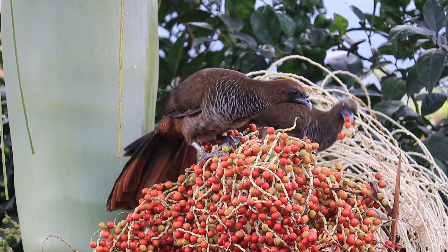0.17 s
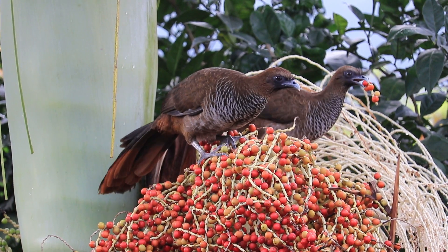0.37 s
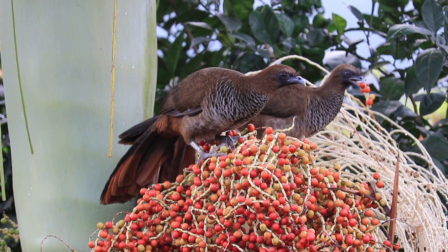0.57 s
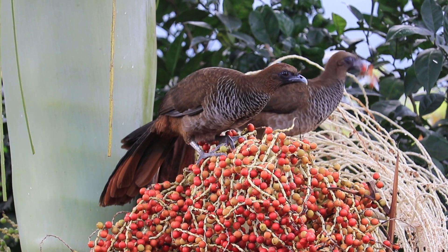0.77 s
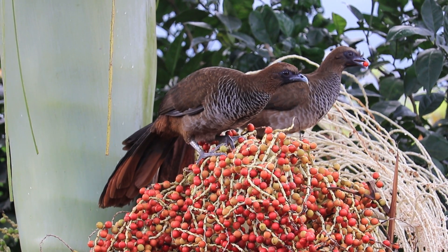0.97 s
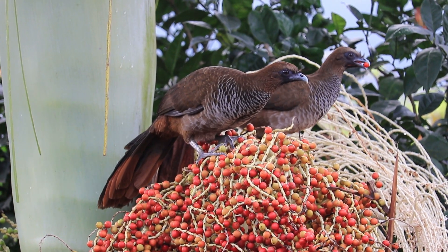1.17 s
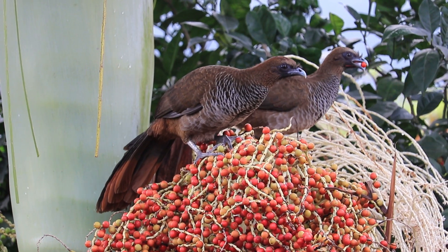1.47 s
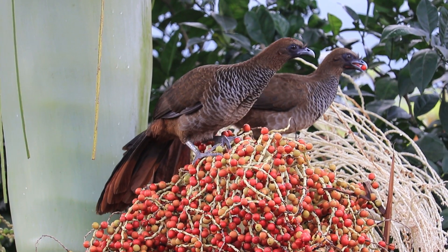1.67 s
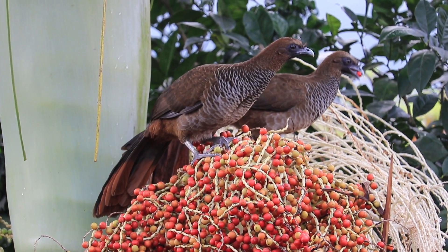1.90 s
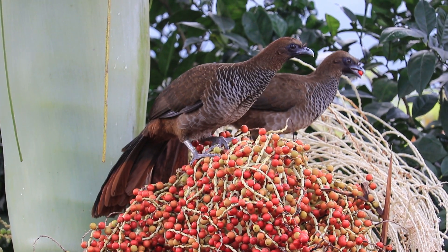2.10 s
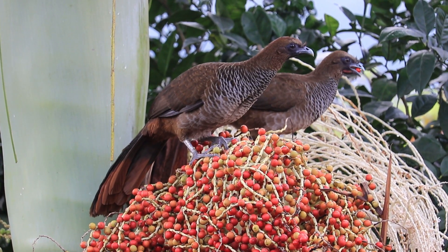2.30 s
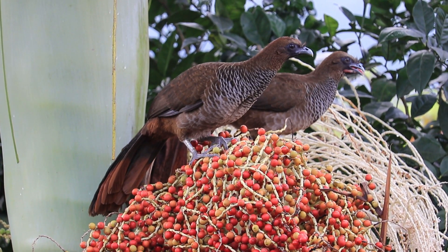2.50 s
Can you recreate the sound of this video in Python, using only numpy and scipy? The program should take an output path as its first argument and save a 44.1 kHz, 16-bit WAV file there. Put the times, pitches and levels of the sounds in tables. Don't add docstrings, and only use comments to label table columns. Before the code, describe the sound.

Outdoor stereo pickup, birds near centre: piercing whistled whines and hoarse falling squawks overlap, with a small bird's quick scolding and twittering midway, light twig knocks, leaf hiss, hard short echoes and low distant traffic.

```python
import sys
import numpy as np
from scipy import signal
from scipy.fft import rfft, irfft, next_fast_len
from scipy.io import wavfile
from scipy.ndimage import uniform_filter1d, map_coordinates

SR = 44100
rng = np.random.default_rng(int(sys.argv[2]) if len(sys.argv) > 2 else 0)


def attenuation_scalar(level_db):
    decades = np.asarray(level_db, float) / 20
    return 10 ** decades


def bounce(signal):
    frames = np.transpose(np.atleast_2d(signal))
    limited = np.clip(frames, -1, 1)
    pcm = np.round(limited * 32767).astype(np.int16)
    wavfile.write(sys.argv[1], SR, pcm)


N = 116865

# time_s, pitch_hz, level_db, overtone_level_db
WHINE_NOTES = [
    [(.243, 1558, -35, -60), (.27, 1775, -22.5, -63), (.31, 1843, -12, -64), (.36, 1760, -23.5, -46),
     (.44, 1770, -21.5, -44), (.55, 1841, -19.5, -45.5), (.65, 1877, -25, -35), (.78, 1875, -23, -36),
     (.803, 1504, -49, -47)],
    [(1.645, 1530, -26, -62), (1.656, 1627, -27.5, -56), (1.668, 1767, -28, -50),
     (1.697, 1796, -15.5, -44.5), (1.737, 1746, -23.5, -46), (1.753, 1695, -42, -39),
     (1.761, 1740, -21, -38), (1.782, 1654, -33, -43)],
    [(1.782, 1703, -45, -35), (1.795, 1697, -31, -38.5), (1.829, 1679, -26.5, -43),
     (1.863, 1690, -29.5, -39), (1.901, 1718, -35.5, -43), (1.931, 1716, -34, -34)],
    [(1.931, 1714, -37, -42), (1.949, 1710, -28.5, -38), (2.003, 1737, -23.5, -42.5),
     (2.021, 1725, -44, -40), (2.043, 1772, -23, -37.5), (2.12, 1806, -21, -35.5),
     (2.2, 1837, -23.5, -35.5), (2.226, 1348, -51, -37)],
]
# frequency_hz, gain_db
WINDPIPE = [(3300, -5), (3800, 5), (5250, -20), (5680, -1), (7150, 1), (7560, -10), (9000, -7), (9450, -20)]
# time_s, pitch_hz, level_db, overtone_level_db
SQUAWK_NOTES = [
    [(.16, 1653, -38, -82), (.175, 2140, -33, -40.5), (.19, 2310, -22.5, -30.5), (.203, 2280, -36, -27),
     (.218, 2280, -23, -30), (.262, 2188, -22, -29.5), (.35, 2062, -23, -23.5), (.42, 1963, -17.5, -30.5),
     (.485, 2004, -41, -46)],
    [(.46, 2062, -53, -48), (.5, 2103, -38, -41.5), (.58, 2027, -52, -43)],
    [(.92, 1600, -31.5, -75), (.933, 2085, -31.5, -40), (.947, 2252, -28, -33), (.975, 2285, -44, -33),
     (1.0, 2218, -15.5, -28.5), (1.06, 2094, -25.5, -26), (1.105, 2025, -18.5, -25.5),
     (1.135, 1963, -31, -34), (1.2, 1944, -48, -59)],
    [(2.16, 1600, -30, -86), (2.18, 2171, -27.5, -40), (2.21, 2237, -42, -31), (2.25, 2232, -23.5, -27.5),
     (2.29, 2107, -27, -28), (2.32, 2038, -29.5, -32), (2.35, 2030, -52, -40)],
]
# multiple_of_pitch, level_db, tilt_db_per_100_hz
SQUAWK_PARTIALS = [(2, -15, 5.5), (3, 3, -1), (3.5, -14.5, -0.5), (4, 2.5, 0), (5, -20, 0.5)]
# frequency_hz, density_db_per_hz
BREATH_SPECTRUM = [(4500, -30), (6200, -3), (7300, -9), (8400, 0), (9600, -26)]
# time_s, pitch_hz, level_db, pulse_level_db
RASP_NOTES = [
    [(.4, 1846, -33, -38), (.435, 1690, -23.5, -37), (.5, 1621, -26.5, -42), (.56, 1493, -41, -42)],
    [(1.095, 1600, -34, -12), (1.12, 1552, -32.5, -26), (1.2, 1540, -36.5, -29), (1.3, 1495, -40.5, -34.5),
     (1.37, 1488, -37.5, -32), (1.5, 1510, -39, -40.5), (1.62, 1480, -44, -43), (1.7, 1605, -30, -35)],
    [(2.28, 1668, -27, -25), (2.305, 1651, -25.5, -20.5), (2.335, 1555, -37, -28.5), (2.42, 1537, -34, -31),
     (2.5, 1520, -36, -33), (2.58, 1527, -33, -34.5), (2.66, 1505, -38, -33)],
]
# centre_hz, width_hz, level_db
THROAT_RESONANCES = [(1600, 220, -1.5), (1781, 317, 8), (2120, 120, -5), (3830, 1800, -79),
                     (6550, 920, -9.5), (8100, 870, -15.5)]
# start_s, length_s, start_hz, end_hz,
# level_db
CHIRP_GLIDES = [(0.11, 0.075, 2470, 2420, -34), (0.383, 0.18, 930, 827, -45),
                (0.654, 0.11, 9300, 9950, -52), (0.747, 0.023, 1200, 1100, -41.5),
                (1.25, .09, 4250, 3950, -52), (1.31, .07, 9300, 10100, -50),
                (1.375, .04, 10200, 10500, -45), (1.56, .035, 1180, 1170, -45),
                (1.65, .035, 6450, 7200, -41), (1.695, .04, 6450, 8200, -41),
                (1.755, .045, 9200, 10100, -53), (1.79, .045, 10050, 10550, -43),
                (1.83, .016, 10500, 9000, -45), (1.735, .02, 7050, 6950, -39),
                (1.632, .015, 4900, 5100, -43), (1.99, 0.06, 860, 930, -44), (2.035, 0.05, 930, 890, -40),
                (2.07, 0.15, 890, 660, -47), (2.141, 0.04, 2280, 2340, -36), (2.345, 0.04, 2530, 2524, -40),
                (2.352, .03, 3110, 3100, -45), (2.535, .025, 880, 1060, -45), (2.555, .028, 1060, 860, -45)]
# start_s, length_s, start_hz, end_hz, level_db
SCOLD_GLIDES = [(1.772, .014, 2550, 2900, -44), (1.772, .014, 3800, 4350, -44),
                (1.778, .012, 5000, 6800, -43), (1.786, .022, 3550, 5300, -30),
                (1.787, .016, 7100, 8900, -39), (1.795, .012, 6200, 7600, -38),
                (1.803, .016, 5200, 5400, -38), (1.798, .022, 2500, 2750, -41),
                (1.817, .01, 4350, 3800, -33), (1.81, .035, 7900, 8200, -41),
                (1.826, .012, 5000, 7200, -42), (1.828, .025, 4100, 3650, -37),
                (1.848, .016, 3800, 3500, -34), (1.858, .012, 4500, 4800, -40),
                (1.864, .02, 3700, 3350, -40)]
# time_s, pitch_hz, level_db, overtone_level_db
PIPE_NOTE = [(.055, 2480, -58, -80), (.085, 2545, -30.5, -70), (.105, 2473, -26, -65),
             (.125, 2360, -37, -70), (.145, 2170, -26.5, -80)]
# start_s, end_s, level_db
TWITTER_BURSTS = [
    (1.63, 1.74, -37),
    (1.785, 1.91, -31),
]
WALL_LEVELS = [
    [-12.5],
    [-8.5],
]
# frequency_hz, t60_s
GARDEN_DECAY = [(1000, 0.24), (5000, 0.86), (12000, 0.12)]
# centre_s, level_db
TWIG_KNOCKS = [(0.302, -31), (0.55, -39), (0.789, -41), (.97, -41), (1.16, -42), (1.36, -41), (1.59, -42),
               (2.198, -40), (2.371, -39)]
# frequency_hz, density_db_per_hz
TWIG_SPECTRUM = [(300, -18), (600, -13.5), (2800, -9.5), (6000, -48)]
# centre_s, length_s, level_db
LEAF_SWELLS = [(0.374, 0.94, -42), (0.816, 0.05, -49), (1.132, 0.067, -61), (1.84, .15, -37),
               (1.69, .13, -43), (2.3, 0.17, -69)]
# frequency_hz, density_db_per_hz
LEAF_SPECTRUM = [(1500, -22), (3200, 0), (8300, -3), (11000, -30)]
# start_s, peak_db
BEAK_TICKS = [(.342, -35), (0.722, -37), (1.404, -36), (1.855, -36), (2.305, -40)]
# frequency_hz, density_db_per_hz
TICK_SPECTRUM = [(7000, -40), (10500, -6), (13000, -6), (16000, -10)]
# frequency_hz, density_db_per_hz
HUM_SPECTRUM = [(15, -20), (40, -1.5), (100, 0), (300, -8.5), (1300, -10.5), (8600, -16), (9800, -22.5),
                (16000, -25)]
# frequency_hz, correlation
HUM_LIKENESS = [(30, 0.85), (125, 1), (400, 0.6), (5000, 0.34), (12000, 0.95)]


def unit(x):
    return x / np.sqrt(np.mean(x ** 2) + 1e-20)


def along(points, hz):
    f, v = np.transpose(points)
    return np.interp(np.log(hz + 1), np.log(f + 1), v)


def curves(rows, fade_s=.004):
    s, *cols = np.transpose(rows)
    t = np.arange(N) / SR
    gate = np.clip(np.minimum(t - s[0], s[-1] - t) / fade_s, 0, 1)
    return [uniform_filter1d(np.interp(t, s, c), size=300) for c in cols] + [gate]


def wobble(rate):
    return map_coordinates(rng.standard_normal(N // 20), [np.arange(N) * rate / SR])


def filtered(x, response):
    m = next_fast_len(N + SR // 2)
    return irfft(rfft(x, m) * response(np.fft.rfftfreq(m, 1 / SR)), m)[..., :N]


def rush(spectrum, alike):
    def response(hz):
        angle = np.arccos(np.clip(along(alike, hz), -1, 1)) / 2
        return attenuation_scalar(along(spectrum, hz)) * [np.cos(angle), np.sin(angle)]

    mid, side = filtered(rng.standard_normal((2, N)), response)
    return unit(np.array([mid + side, mid - side]))


def whistle(call, overtones, shake_hz, flutter_db, over_flutter_db, hoarse=0):
    hz, db, over_db, gate = curves(call)
    elapsed = np.cumsum(gate)
    fatigue = (2130 - hz + 400 * (elapsed / gate.sum() - .5)) / 300
    tired = hoarse * np.clip(fatigue, 0, 1) * (elapsed > 2000)
    phase = 2 * np.pi * np.cumsum(hz + shake_hz * wobble(300)) / SR
    upper = np.zeros(N)
    for multiple, level in overtones:
        flutter = over_flutter_db * (wobble(60) + 0.69 * wobble(140))
        roughness = 1 - tired + tired * wobble(550)
        upper += attenuation_scalar(over_db + level(hz) + flutter) * roughness * np.sin(multiple * phase)
    strength = attenuation_scalar(db + flutter_db * wobble(45.66))
    roughness = 1 - 0.71 * tired * (1 - wobble(260))
    return np.sqrt(2) * gate * (strength * roughness * np.sin(phase) + upper)


def whiner():
    overtones = [(k, lambda hz, k=k: along(WINDPIPE, k * hz)) for k in range(2, 6)]
    return sum(whistle(c, overtones, shake_hz=2.54, flutter_db=-0.1, over_flutter_db=1.04)
               for c in WHINE_NOTES)


def squawk_breath():
    strength = np.zeros(N)
    for call in SQUAWK_NOTES:
        _, _, over_db, gate = curves(call)
        strength += attenuation_scalar(over_db - 12) * gate
    return strength * rush(BREATH_SPECTRUM, [(5000, 1)])[0]


def squawk_whistles():
    overtones = [(k, lambda hz, db=db, tilt=tilt: db + tilt * (hz - 2200) / 100)
                 for k, db, tilt in SQUAWK_PARTIALS]
    return sum(whistle(c, overtones, shake_hz=13, flutter_db=3, over_flutter_db=2.8, hoarse=.75)
               for c in SQUAWK_NOTES)


def throat_response(hz):
    return sum(attenuation_scalar(db) * (1j * hz * width / (centre * centre - hz * hz + 1j * hz * width)) ** 2
               for centre, width, db in THROAT_RESONANCES)


def throat_pulses():
    rate_hz, jitter, scatter_db = 230, .3, 3.5
    cycles = np.floor(np.cumsum(rate_hz * np.exp(jitter * wobble(120))) / SR)
    strength = attenuation_scalar(scatter_db * np.clip(rng.standard_normal(N), -2, 1))
    pulses = np.diff(cycles, prepend=0) * strength + 0.05 * rng.standard_normal(N)
    return unit(filtered(pulses, throat_response))


def rasps():
    grating = throat_pulses()
    out = np.zeros(N)
    for call in RASP_NOTES:
        hz, db, pulse_db, gate = curves(call, fade_s=.03)
        phase = 2 * np.pi * np.cumsum(hz + 35 * wobble(150)) / SR
        tone = np.sin(phase) + 0.045 * np.sin(2 * phase)
        low = np.sqrt(2) * attenuation_scalar(db + 3.16 * wobble(60)) * tone
        out += gate * (low + attenuation_scalar(pulse_db + 1.8 * wobble(22)) * grating)
    return out


def squawker():
    return squawk_breath() + squawk_whistles() + rasps()


def chirps():
    out = np.zeros(N + SR)
    flutter = attenuation_scalar(2.5 * wobble(110))
    for s, length, start_hz, end_hz, db in CHIRP_GLIDES + SCOLD_GLIDES:
        u = np.arange(round(length * SR)) / (length * SR)
        hz = start_hz + (end_hz - start_hz) * u
        envelope = attenuation_scalar(db) * np.sqrt(2) * np.sin(np.pi * u) ** .8
        out[round(s * SR):][:len(u)] += envelope * np.sin(2 * np.pi * np.cumsum(hz) / SR)
    return out[:N] * flutter


def pipe():
    return whistle(PIPE_NOTE, [(2, lambda hz: 0)], shake_hz=14, flutter_db=0.4, over_flutter_db=1.1)


def twitter(count=70):
    out = np.zeros(N)
    u = np.arange(450) / 450
    for start, end, db in TWITTER_BURSTS:
        for when, pitch, slur, size in rng.random((count, 4)):
            hz = 2500 * 3.5 ** pitch * (1 + .45 * (slur - .4) * u)
            note = np.sin(np.pi * u) ** 2 * np.sin(2 * np.pi * np.cumsum(hz) / SR)
            first = round((start + when * (end - start)) * SR)
            out[first:][:len(u)] += attenuation_scalar(db - 6 * (pitch + when + 2 * size)) * note
    return out


def wall(x):
    return attenuation_scalar(WALL_LEVELS) * np.pad(x, (round(0.028 * SR), 0))[:N]


def garden(x):
    delay_s = .012
    hz, t, z = signal.stft(rng.standard_normal((2, SR // 2)), SR, nperseg=256)
    decay = attenuation_scalar(-60 * t / along(GARDEN_DECAY, hz)[:, None])
    tail = signal.istft(z * decay, SR, nperseg=256)[1]
    tail = .5 * tail[0] + tail
    late = np.pad(x, (round(delay_s * SR), 0))[None]
    return signal.fftconvolve(late, tail / np.linalg.norm(tail[0]), axes=1)[:, :N]


def swell(s, length, db):
    t = np.arange(N) / SR
    return attenuation_scalar(db) * np.exp(-2 * (2 * (t - s) / length) ** 2)


def twig_knocks():
    return sum(swell(s, .13, db) for s, db in TWIG_KNOCKS) * attenuation_scalar(2.2 * wobble(140))


def leaf_friction():
    return sum(swell(*row) for row in LEAF_SWELLS) * attenuation_scalar(2.5 * wobble(250))


def beak_ticks():
    t, t60_s = np.arange(N) / SR, 0.096
    return sum(attenuation_scalar(db - 60 * np.abs(t - s) / t60_s) * (t >= s) for s, db in BEAK_TICKS)


def foliage():
    knock, hiss, tick = twig_knocks(), leaf_friction(), beak_ticks()
    twigs = knock * rush(TWIG_SPECTRUM, [(1000, 0.71)])
    leaves = hiss * rush(LEAF_SPECTRUM, [(5000, 0.57)])
    beaks = tick * rush(TICK_SPECTRUM, [(12000, 0.19)])
    return twigs + leaves + beaks


def hum():
    return attenuation_scalar(-39) * rush(HUM_SPECTRUM, HUM_LIKENESS)


def scene():
    birds = whiner() + squawker() + chirps() + pipe() + twitter()
    direct = birds * attenuation_scalar([[.3], [-.3]])
    echoes = wall(birds) + attenuation_scalar(-13) * garden(birds)
    return direct + echoes + foliage() + hum() * attenuation_scalar([[.35], [-.35]])


def low_pass(x):
    return signal.sosfilt(signal.butter(12, 15830, fs=SR, output="sos"), x)


def record(dry):
    top_hz = 15830
    mix = filtered(dry, lambda hz: hz < top_hz)
    return low_pass(mix)


dry = scene()
out = record(dry)
bounce(out)
```